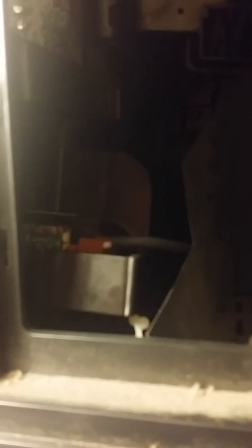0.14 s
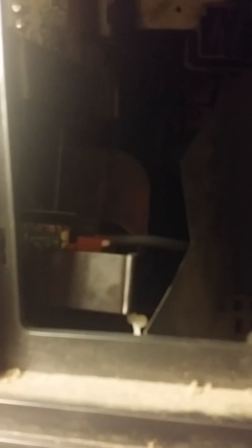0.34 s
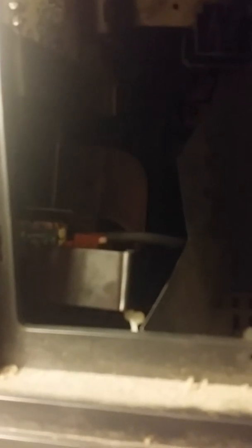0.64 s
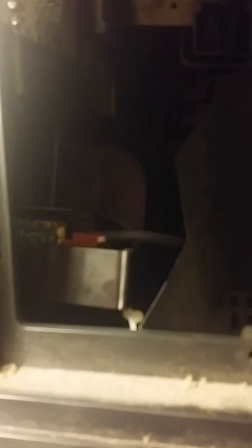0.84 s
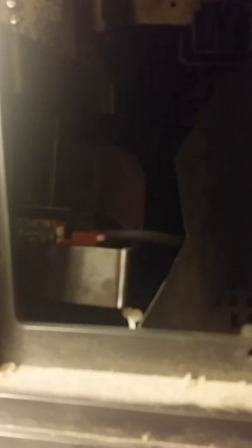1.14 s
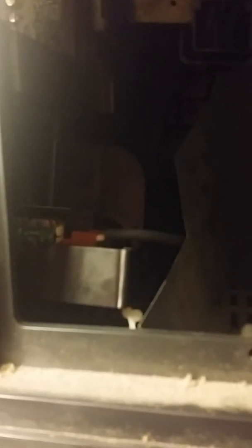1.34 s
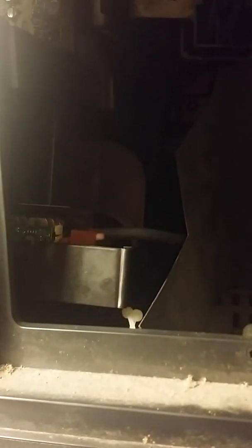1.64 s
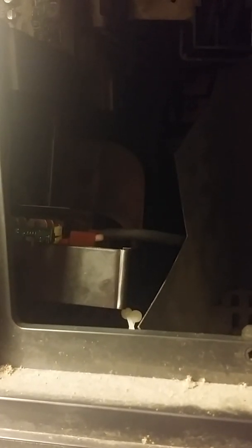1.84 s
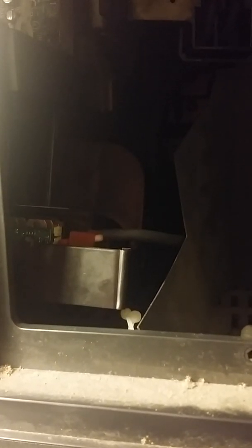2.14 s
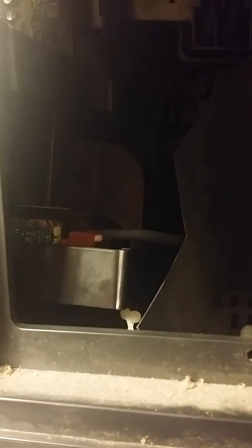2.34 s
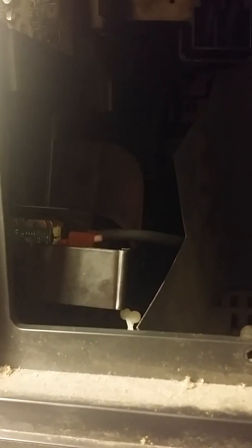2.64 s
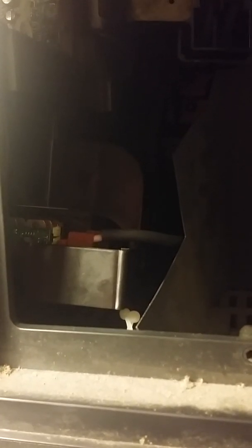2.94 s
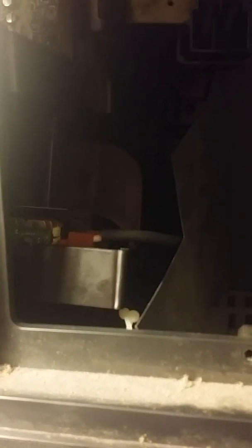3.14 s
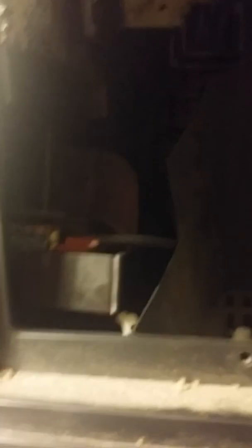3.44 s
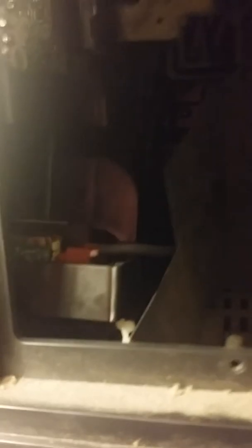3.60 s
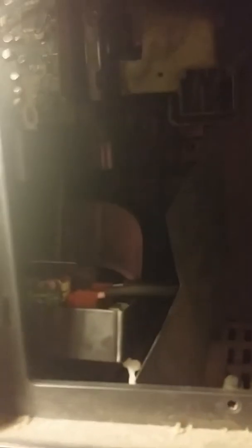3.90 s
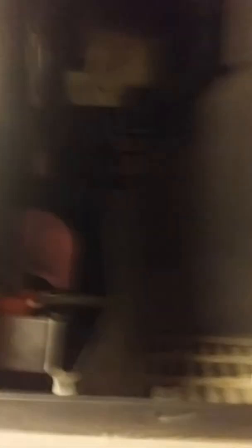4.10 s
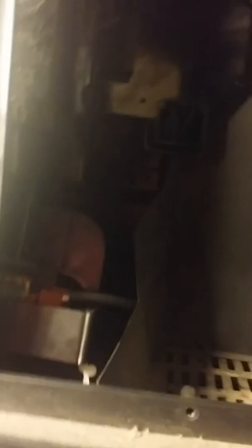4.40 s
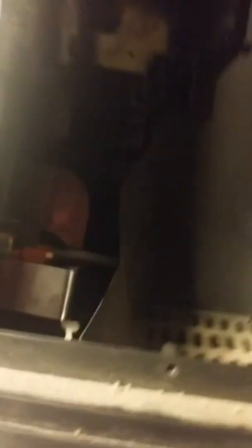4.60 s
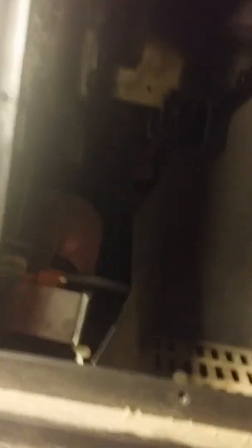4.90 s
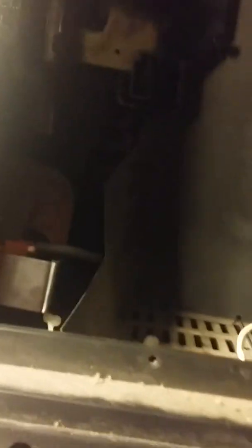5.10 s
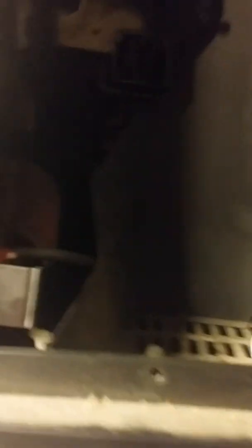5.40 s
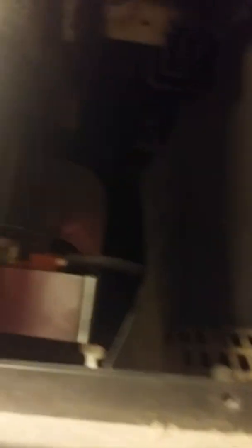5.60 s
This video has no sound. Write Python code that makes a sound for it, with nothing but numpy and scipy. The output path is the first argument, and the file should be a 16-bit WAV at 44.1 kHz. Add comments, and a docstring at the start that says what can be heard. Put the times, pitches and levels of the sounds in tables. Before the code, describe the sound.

Low electrical fan drone with soft rushing air, a short echoing clack, and later a burst of close, harsh handling thumps and rubbing.

```python
"""Inside the open cabinet of a television: cooling fans hum as drifting partials, over mains hum and air noise.
A sharp clack rings through the cabinet as decaying, coloured noise.
A finger then taps (pressure swings with cracks) and slides (clumpy friction noise) over the right
microphone port, the palm rustles on the casing, and loud peaks make the recorder turn its gain down."""
import sys
import numpy as np
from scipy import signal
from scipy.fft import rfft, irfft, next_fast_len
from scipy.io import wavfile
from scipy.ndimage import minimum_filter1d, map_coordinates

SR = 44100
rng = np.random.default_rng(int(sys.argv[2]) if len(sys.argv) > 2 else 0)


def wav_record(signal):
    """Record a signal, one row per channel, as 16-bit PCM in the file named by sys.argv[1]."""
    frames = np.transpose(np.atleast_2d(signal))
    bounded = np.clip(frames, -1, 1)
    # unit amplitude maps onto the largest positive 16-bit level
    quanta = np.round(bounded * 32767).astype(np.int16)
    wavfile.write(sys.argv[1], SR, quanta)


N = 253575


def amp(db):
    """Decibels to gain."""
    return 10 ** (np.asarray(db) / 20)


def unit(x):
    """x at rms 1."""
    return x / np.sqrt(np.mean(x ** 2) + 1e-20)


def along(points, hz):
    """Each column of a (f/Hz, ..) table, interpolated on a log frequency axis."""
    f, *cols = np.transpose(points)
    return np.array([np.interp(np.log(hz + 1), np.log(f + 1), c) for c in cols])


def clock():
    """Time of each sample, s."""
    return np.arange(N) / SR


def wobble(rate_hz):
    """Smooth random curve, rate_hz knots a second."""
    knots = rng.standard_normal(int(N * rate_hz / SR) + 4)
    fine = np.arange(0, len(knots) - 1, 1 / 10)
    smooth = map_coordinates(knots, [fine])
    return np.interp(clock() * rate_hz, fine, smooth)


def filtered(x, response):
    """x through a zero-phase response of frequency."""
    m = next_fast_len(N + SR // 2)
    return irfft(rfft(x, m) * response(np.fft.rfftfreq(m, 1 / SR)), m)[..., :N]


# left-right likeness of the ports: f/Hz, cosine of the phase skew or noise correlation
PORT_LIKENESS = [(60, 0.92), (300, 0.94), (640, 0.62), (1400, -0.28), (3000, -0.066)]


def port_skew(hz):
    """Angle between the ports, rad: small in the bass, about a quarter turn in the treble."""
    return np.arccos(np.clip(along(PORT_LIKENESS, hz)[0], -1, 1))


def tone(turns, left_db, right_db, flutter_db, jitter_rad):
    """One partial shaken by turbulence; the higher, the more its phase wavers and differs between ports."""
    hz = turns[-1] * SR / N
    phase = 2 * np.pi * (turns + rng.random()) + jitter_rad * (1 + hz / 700) * wobble(11)
    left = amp(left_db) * np.sin(phase)
    right = amp(right_db) * np.sin(phase - port_skew(hz))
    return np.sqrt(2) * amp(flutter_db * wobble(11)) * np.array([left, right])


def cabinet_noise(spectrum, resonances, unevenness_db, spacing_hz=60):
    """Stereo noise coloured by the cabinet; the ports share the bass but hear unrelated treble."""
    def split(hz):
        half = port_skew(hz) / 2
        return np.array([np.cos(half), np.sin(half)])

    # fine random unevenness of the spectrum, stronger in the treble, different in each channel
    knots = rng.standard_normal((2, SR // 20))

    def colour(hz):
        humps = sum(db / (1 + (2 * (hz - centre) / width) ** 2) for centre, width, db in resonances)
        uneven = np.array([np.interp(hz / spacing_hz, np.arange(len(k)), k) for k in knots])
        return amp(along(spectrum, hz) + humps + unevenness_db * uneven * hz / (hz + 1500))

    mid, side = filtered(rng.standard_normal((2, N)), split)
    return filtered(np.array([mid + side, mid - side]), colour) * np.sqrt(SR / 2)


def push(t, hz, cycles_to_peak=0.36):
    """Pressure swing of a cycle or two."""
    t = np.maximum(t, 0)
    u = t * hz / cycles_to_peak
    return np.sin(2 * np.pi * hz * t) * u * np.exp(1 - u)


def contact(start_s, end_s, rise_s, fall_s):
    """Attack, hold and release of one touch."""
    t = clock()
    attack = 1 - np.exp(-np.maximum(t - start_s, 0) / rise_s)
    return attack * np.exp(-np.maximum(t - end_s, 0) / fall_s)


def skin_noise(spectrum, grain_db, grain_rate_hz):
    """Skin catches and slips, so friction noise comes in tiny clumps; rms 1."""
    slips = rng.standard_normal(N) * amp(grain_db * wobble(grain_rate_hz))
    return unit(filtered(slips, lambda hz: amp(along(spectrum, hz)[0])))


# main fan speed: t/s, shaft rate f/Hz
SHAFT_RATE = [(0, 145.36), (1.1, 145.23), (1.8, 145.35), (3.1, 145.17), (4.2, 145.62), (5.0, 145.38)]


def shaft_turns():
    """Turns of the main shaft: its drifting rate integrated."""
    return np.cumsum(np.interp(clock(), *np.transpose(SHAFT_RATE))) / SR


# main fan partials: multiple of shaft rate, left level/dB, right level/dB, gain after the move/dB
FAN_ORDERS = [(1, -63, -61.5, 6), (2, -77, -59.5, 3), (3, -65.5, -79, -3), (4, -63, -65.5, 5),
              (5, -58, -54, 0), (6, -67, -73, 0), (7, -64, -58.5, -6), (8, -57.5, -65, 7),
              (9, -63, -62.5, -3), (10, -70.5, -79, 2)]
MOVE_S, MOVE_TAKES_S = 5.5, 0.19


def main_fan(turns):
    """Shaft harmonics; the microphone drifts to another spot in the fan's standing waves."""
    moved = (1 + np.tanh((clock() - MOVE_S) / MOVE_TAKES_S)) / 2
    return sum(amp(gain_db * moved) * tone(k * turns, left, right, flutter_db=1.06, jitter_rad=0.086)
               for k, left, right, gain_db in FAN_ORDERS)


# blade and motor tones: f/Hz at the reference shaft rate, left level/dB, right level/dB
OTHER_FAN_TONES = [(57.2, -60.5, -56.5), (254.4, -50.5, -45.5), (410, -68.5, -66.5), (507, -76, -66),
                   (547.7, -64.5, -61.5), (682.5, -62.5, -60.5), (990, -84, -60), (1134, -65, -76),
                   (1670, -63, -65.5), (4760, -89.5, -76), (5000, -86, -74.5)]
SHAFT_REF_HZ = 145.35


def other_fans(turns):
    """Blade and motor tones, drifting in proportion to the main shaft."""
    return sum(tone(hz * turns / SHAFT_REF_HZ, left, right, flutter_db=0.17, jitter_rad=0.14)
               for hz, left, right in OTHER_FAN_TONES)


# finger taps at the port: t/s, push level/dB, push f/Hz, crack level re push/dB
FINGER_TAPS = [(3.2577, -23.5, 940, -3), (3.3128, -17.5, 815, -11.5), (3.3454, -15.5, 1670, -10),
               (3.9923, -7, 870, -14), (4.051, -22.5, 5700, -1.5), (4.1166, -5.5, 514, -21),
               (4.2235, -9, 1130, -6), (4.2652, -21, 1300, -17), (4.2826, 6, 540, -15),
               (4.3371, 5.5, 520, -18.5), (4.4075, 1, 1800, -13.5), (4.4985, 1, 864, -9.5)]
THUD_HZ, THUD_DB, THUD_LAG_S = 159, -22.5, 0.0021  # level re push
CRACK_LOW_HZ, CRACK_HIGH_HZ, CRACK_T60_S = 1110, 3140, 0.0075
FIZZ_DB, FIZZ_T60_S = -8.5, 0.0025  # wide-band edge, level re crack


def taps():
    """Each touch cracks and pumps the port; the flesh of the fingertip then settles with a soft thud."""
    out, t = np.zeros(N + SR), np.arange(SR // 20) / SR
    band = signal.butter(2, [CRACK_LOW_HZ, CRACK_HIGH_HZ], "bandpass", fs=SR, output="sos")
    thud = amp(THUD_DB) * push(t - THUD_LAG_S, THUD_HZ)
    for start_s, db, hz, crack_db in FINGER_TAPS:
        body, edge = rng.standard_normal((2, len(t)))
        crack = unit(signal.sosfilt(band, body)) * amp(-60 * t / CRACK_T60_S)
        fizz = edge * amp(FIZZ_DB - 60 * t / FIZZ_T60_S)
        tap = amp(crack_db) * (crack + fizz) + push(t, hz) + thud
        out[round(start_s * SR):][:len(t)] += amp(db) * tap
    return out[:N]


# strokes over the port: start t/s, end t/s, scrape level/dB, seal 0-1
FINGER_STROKES = [(3.485, 3.518, -57.5, 0.86), (3.743, 3.795, -48, 0.5), (3.838, 3.879, -46.5, 0),
                  (3.923, 3.944, -25, 0), (3.945, 4.009, -34.5, 0.03), (4.03, 4.086, -38, 0.2),
                  (4.118, 4.204, -28, 0.18), (4.2, 4.256, -48, 0), (4.279, 4.317, -23.5, 0.63),
                  (4.292, 4.311, -20, 0.92), (4.345, 4.476, -28, 0.86), (4.478, 4.505, -21.5, 0.74),
                  (4.503, 4.599, -40.5, 0.49)]
# air sealed under the finger: f/Hz, relative level/dB
TRAPPED_AIR = [(30, -45), (100, -24), (220, -5.5), (400, -0.5), (650, -2), (820, -5), (1050, -19),
               (2500, -64)]
# skin scrape: f/Hz, relative level/dB
SCRAPE_COLOUR = [(60, -11), (150, 3), (450, -18), (1000, 2), (1800, 0), (2700, -2), (3600, -9.5),
                 (4500, -19), (6000, -26), (7500, -20.5), (15000, -50)]
# skin hiss: f/Hz, relative level/dB
HISS_COLOUR = [(500, -25), (2000, -13), (3500, -2.5), (6000, -5.5), (7500, -11), (9500, 2.5), (12500, -1),
               (15500, -3)]
OPEN_AIR_DB, SEAL_AIR_DB = -13.5, 29  # trapped air re scrape, port open; gain at full seal
HISS_DB, HISS_DB_PER_DB, SEAL_HISS_DB = -13.5, 0.6, -14.5  # offset; growth with scrape; gain at full seal


def rubbing(grip_s=0.0019, let_go_s=0.0049):
    """Strokes scrape and hiss; a finger sealing the port dulls the hiss and makes trapped air rumble."""
    levels = np.zeros((3, N))
    for start, end, scrape_db, seal in FINGER_STROKES:
        air_db = scrape_db + OPEN_AIR_DB + SEAL_AIR_DB * seal
        hiss_db = HISS_DB + HISS_DB_PER_DB * scrape_db + SEAL_HISS_DB * seal
        stroke = amp([air_db, scrape_db, hiss_db])[:, None] * contact(start, end, grip_s, let_go_s)
        levels = np.maximum(levels, stroke)
    trapped = skin_noise(TRAPPED_AIR, grain_db=3.5, grain_rate_hz=270)
    scrape = skin_noise(SCRAPE_COLOUR, grain_db=3.5, grain_rate_hz=490)
    hiss = skin_noise(HISS_COLOUR, grain_db=1.5, grain_rate_hz=550)
    return (levels * [trapped, scrape, hiss]).sum(0)


def lift_plop(lift_s=4.503, level_db=-10, hz=133):
    """The finger comes off the port and the trapped air escapes with a plop."""
    return amp(level_db) * push(clock() - lift_s, hz)


# palm brushing the casing: start t/s, end t/s, level/dB
PALM_BRUSHES = [(3.22, 3.328, -42.5), (3.447, 4.533, -45), (5.288, 5.75, -49.5)]
# palm rustle: f/Hz, relative level/dB
PALM_COLOUR = [(100, -6), (600, 4), (1300, 9), (2500, 3), (4200, -3.5), (7500, -3), (9500, 0), (12500, 3),
               (15500, -2)]


def palm(rise_s=0.13, fall_s=0.022):
    """The palm slides on the casing as the grip shifts: a rustle that swells slowly and stops quickly."""
    level = sum(amp(db) * contact(start, end, rise_s, fall_s) for start, end, db in PALM_BRUSHES)
    return level * skin_noise(PALM_COLOUR, grain_db=1.5, grain_rate_hz=300)


# clack before panels and band gains: f/Hz, left density/(dB per Hz), right density/(dB per Hz)
CLACK_COLOUR = [(30, -78, -75), (70, -71, -60), (119, -56, -51), (350, -63, -56.5), (745, -62.5, -57.5),
                (1200, -66, -64.5), (1700, -68, -65.5), (2740, -67.5, -65), (4200, -67.5, -70.5),
                (6500, -69, -73), (9500, -76, -70), (13000, -84, -70.5), (15500, -86, -80)]
# cabinet panels: f/Hz, width/Hz, gain/dB
PANEL_MODES = [(164, 29, -14), (213, 24, 10), (740, 42, 11), (1300, 130, 6.5), (2100, 250, 3.5)]
CLACK_S = 1.9405


def clack(rise_s=0.0045, bass_rise_s=0.013, t60_s=0.29, bass_t60_s=0.31, split_hz=320, upper_db=3.5, bass_db=8):
    """A clack deep in the cabinet arrives as dense reflections; the bass builds up more slowly."""
    t = np.maximum(clock() - CLACK_S, 0)
    ring = cabinet_noise(CLACK_COLOUR, PANEL_MODES, unevenness_db=0.5)
    bass = filtered(ring, lambda hz: 1 / (1 + (hz / split_hz) ** 4))
    upper = (ring - bass) * (1 - np.exp(-t / rise_s)) * amp(upper_db - 60 * t / t60_s)
    return upper + bass * (1 - np.exp(-t / bass_rise_s)) ** 2 * amp(bass_db - 60 * t / bass_t60_s)


# mains hum: f/Hz, left level/dB, right level/dB
MAINS_TONES = [(60.4, -69, -63.5), (118.6, -62.5, -50)]


def mains_hum():
    """Mains partials at fixed pitch, fluttering in level."""
    return sum(tone(hz * clock(), left, right, flutter_db=1.9, jitter_rad=0.065)
               for hz, left, right in MAINS_TONES)


# rushing air before resonances: f/Hz, left density/(dB per Hz), right density/(dB per Hz)
AIR_COLOUR = [(25, -92, -90), (42, -91, -81), (57, -78, -71), (126, -78.5, -73.5), (324, -84, -78),
              (423, -85, -86.5), (790, -91, -82.5), (1390, -89, -86.5), (2280, -90, -87.5),
              (3540, -99, -99), (6380, -95, -101), (8070, -106, -104), (11200, -105, -99),
              (15000, -103, -96.5)]
# air resonances and hollows: f/Hz, width/Hz, gain/dB
CABINET_MODES = [(537, 180, 4.5), (767, 92, 8.5), (1080, 130, 1), (1900, 150, 4), (2240, 520, -4.5),
                 (5200, 130, 5.5), (6470, 400, 1.5), (10660, 250, 4), (14300, 340, 2.5)]


def rushing_air():
    """Fan-driven air: steady noise shaped by the cabinet's resonances."""
    return cabinet_noise(AIR_COLOUR, CABINET_MODES, unevenness_db=4.0)


def scene():
    """Finger at the right port; a trace, mostly treble, crosses the casing to the left one."""
    turns = shaft_turns()
    finger = taps() + rubbing() + lift_plop() + palm()
    leak_points = [(600, -48), (2500, -32.0), (6000, -11.5), (11000, -26)]  # f/Hz, gain/dB
    leak = filtered(finger, lambda hz: amp(along(leak_points, hz)[0]))
    fans = main_fan(turns) + other_fans(turns)
    return fans + np.array([leak, finger]) + clack() + mains_hum() + rushing_air()


def record(dry, trigger_db=-6.5, depth_db=5.5, hold_s=0.66, release_db_per_s=12, low_hz=45, top_hz=15550):
    """Low cut; loud peaks turn the gain down, it holds and creeps back; then clipping and a band limit."""
    dry = signal.sosfilt(signal.butter(8, low_hz, "high", fs=SR, output="sos"), dry)
    peak_db = 20 * np.log10(np.abs(dry).max(0) + 1e-9)
    over_db = np.clip(peak_db - trigger_db, 0, depth_db)
    size = int(hold_s * SR) | 1
    held_db = -minimum_filter1d(-over_db, size, origin=size // 2, mode="constant")
    ramp_db = release_db_per_s * clock()
    cut_db = np.maximum.accumulate(held_db + ramp_db) - ramp_db
    return filtered(np.clip(dry * amp(-cut_db), -1, 1), lambda hz: hz < top_hz)


dry = scene()
out = record(dry)
wav_record(out)
```